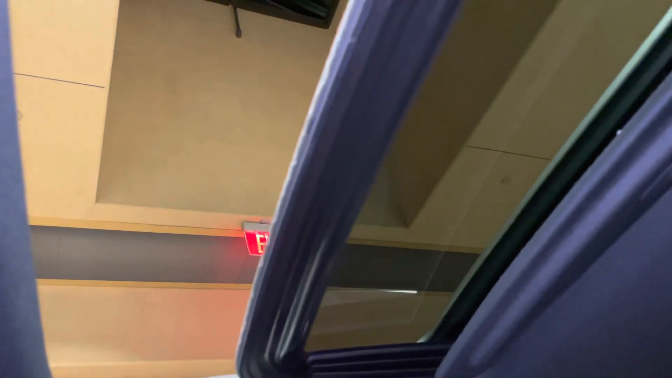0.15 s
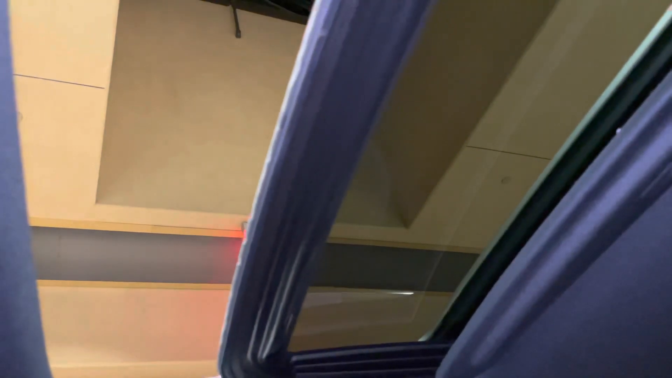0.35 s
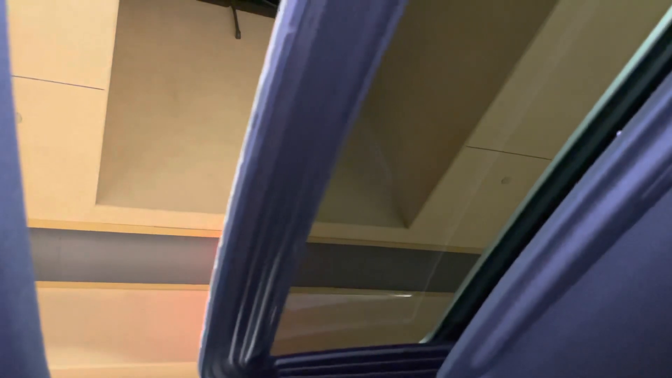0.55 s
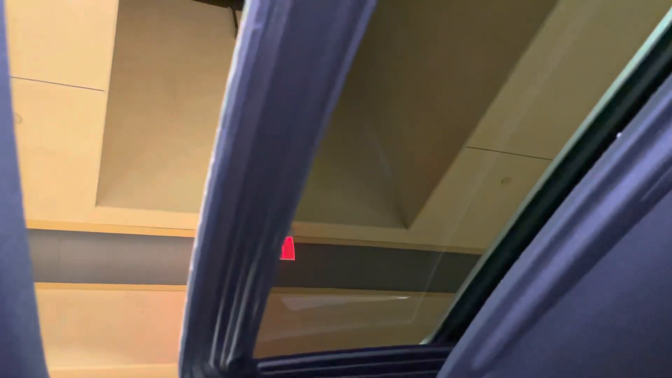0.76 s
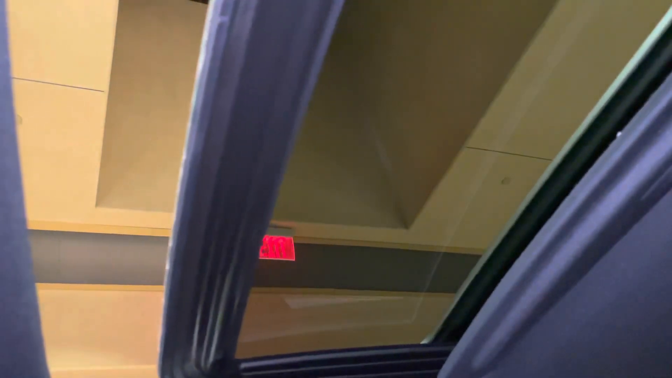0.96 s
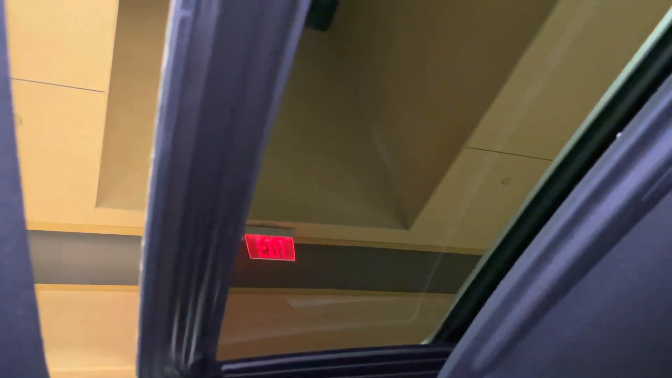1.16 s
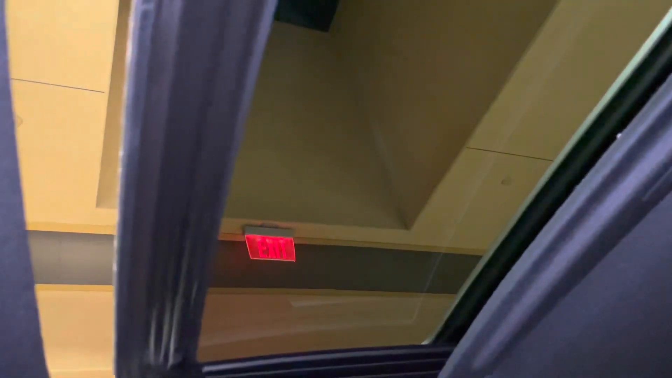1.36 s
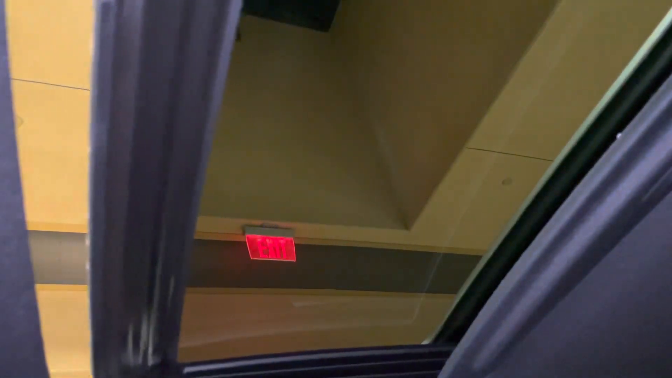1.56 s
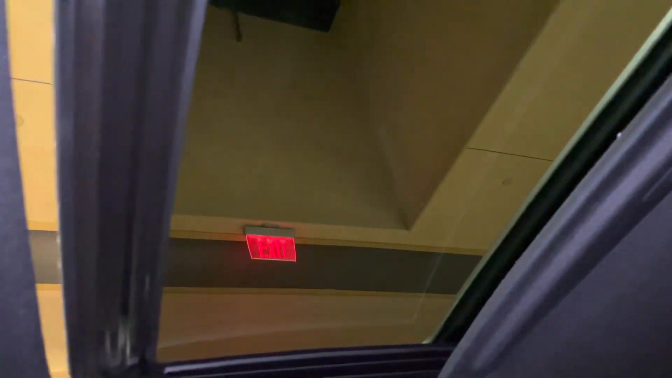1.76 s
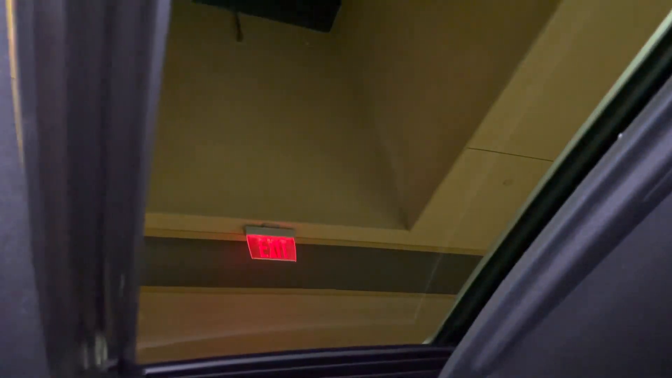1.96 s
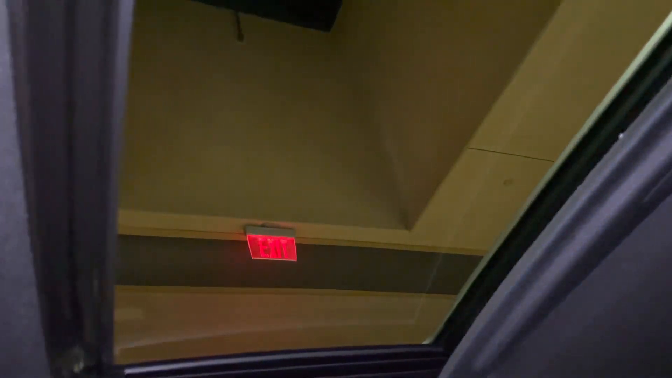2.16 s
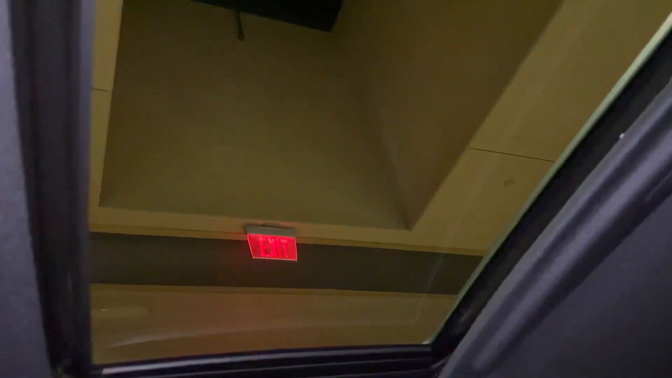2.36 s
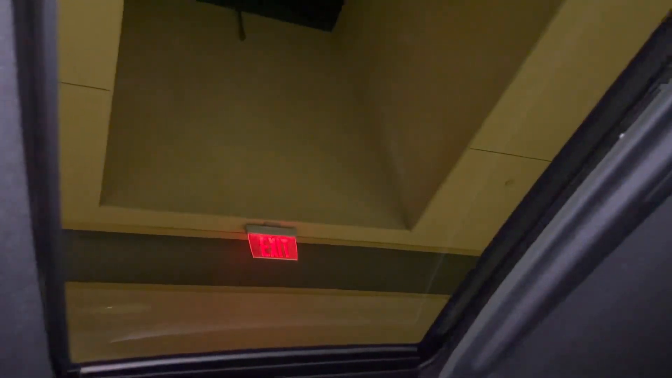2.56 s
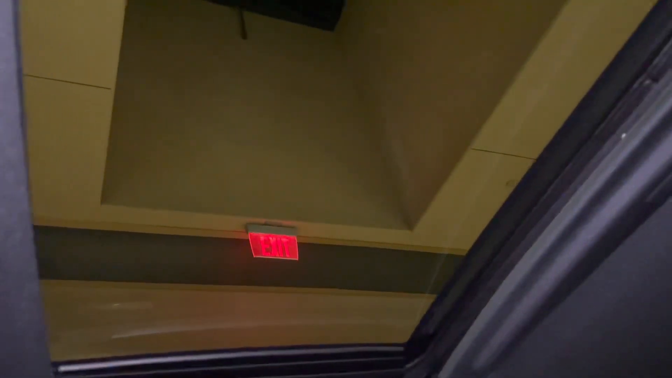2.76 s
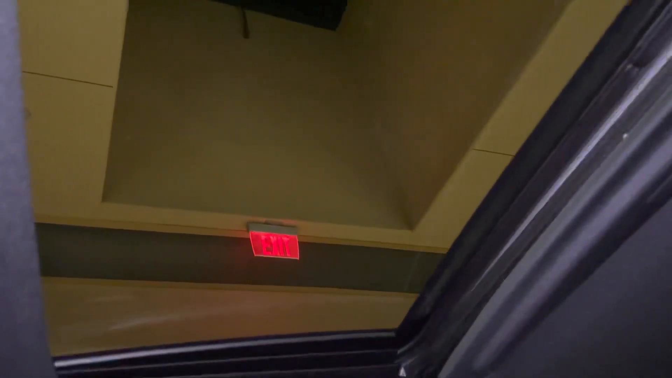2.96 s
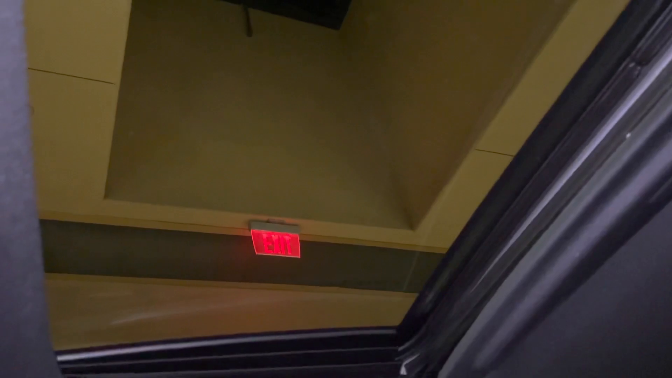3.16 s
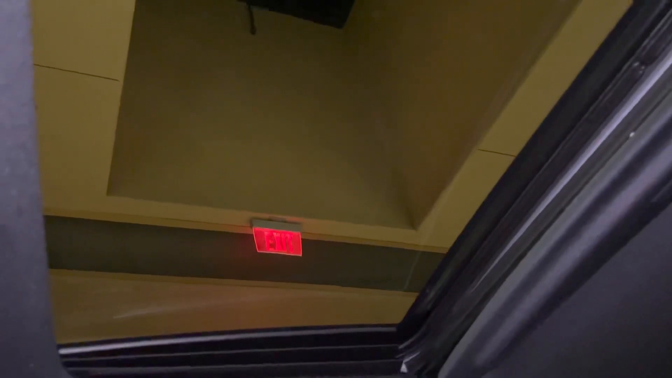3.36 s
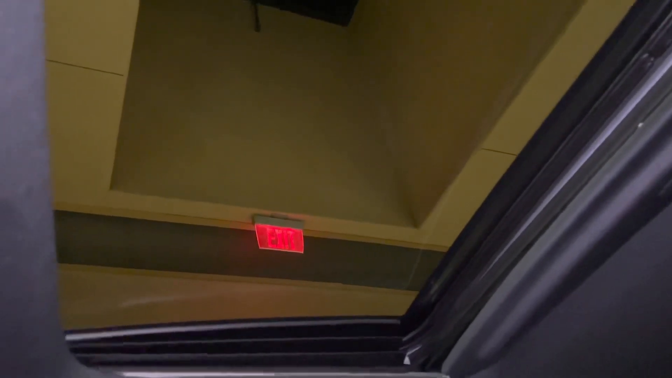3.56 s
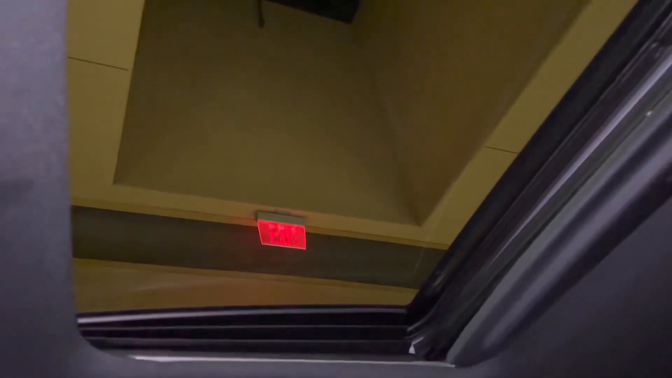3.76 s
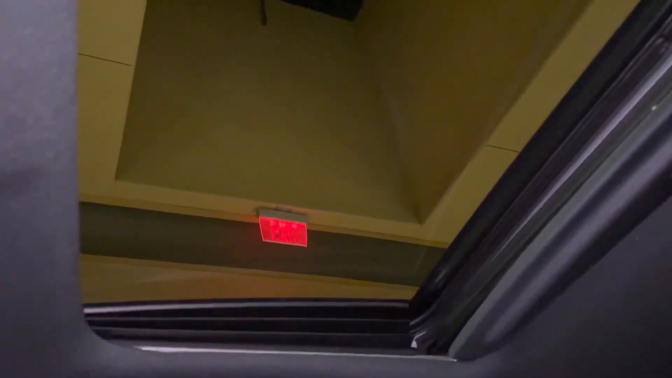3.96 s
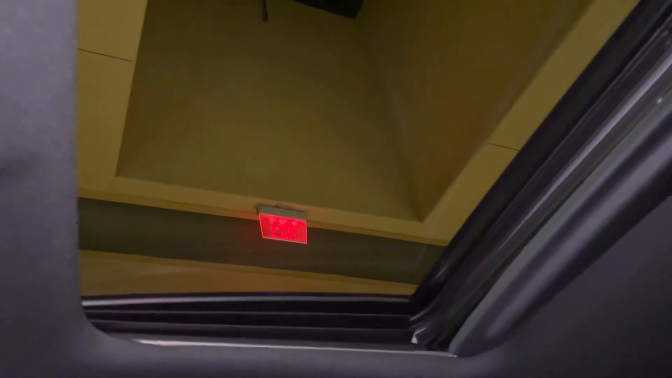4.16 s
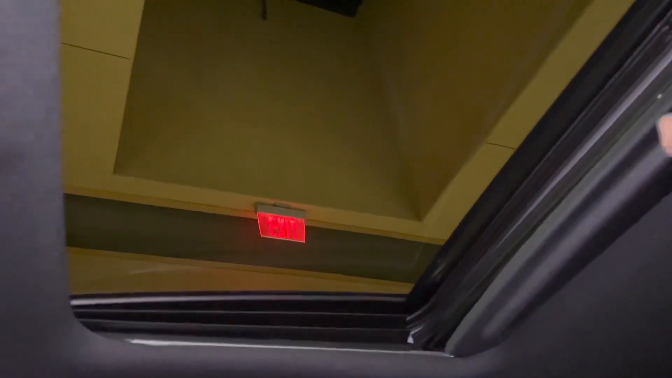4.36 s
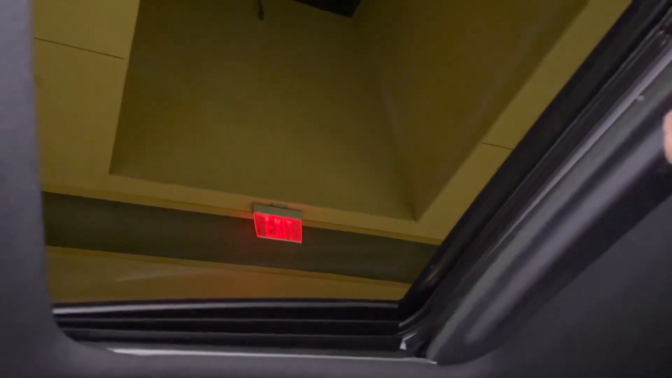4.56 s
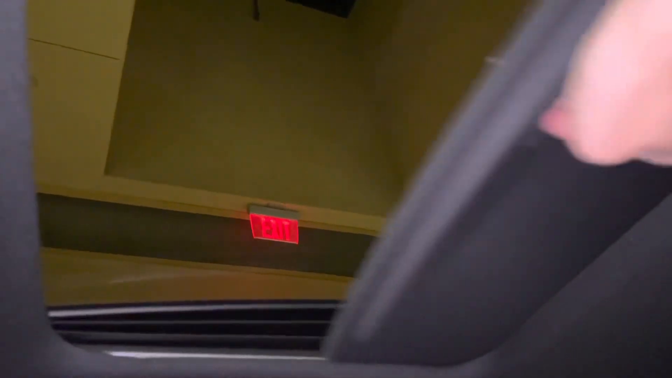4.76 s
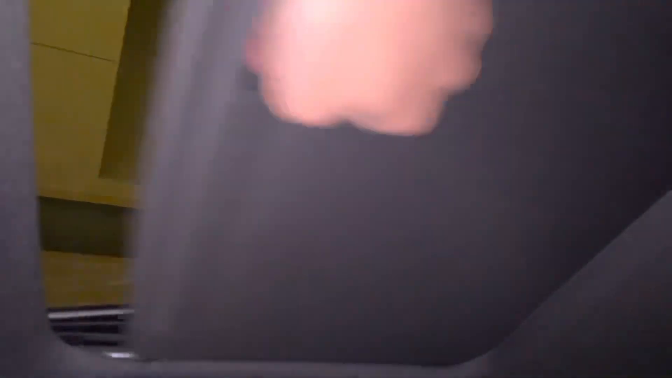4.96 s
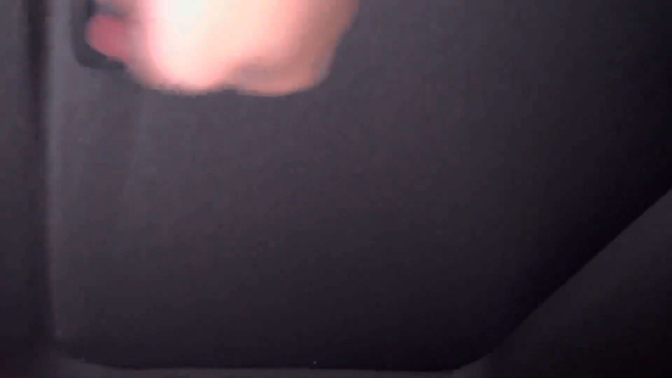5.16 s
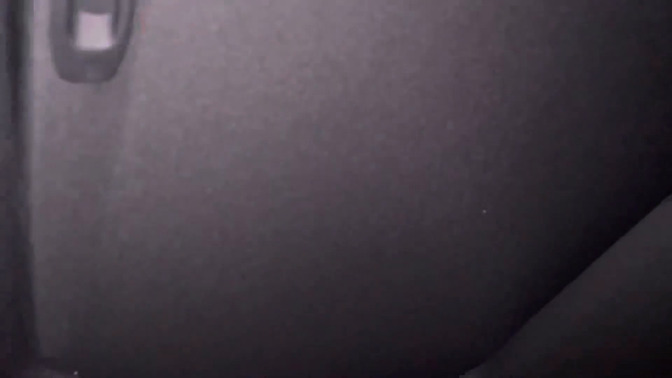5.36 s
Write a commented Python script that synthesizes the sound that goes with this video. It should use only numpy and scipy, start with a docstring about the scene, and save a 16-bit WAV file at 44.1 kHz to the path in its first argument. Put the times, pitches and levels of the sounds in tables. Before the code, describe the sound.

Inside an idling car, a motorized roof panel whirs closed with thuds and a click, then a hand-pushed sunshade rubs quickly and slams.

```python
"""An idling engine hums through a car cabin while a sunroof motor whines and its glass rumbles along its rails.
The glass crunches into its seal, the cabin booms, the drive stops with a clunk and a switch clicks.
Then a hand slides the sunshade faster and faster until it bangs shut. A phone with two microphone ports
hears it close by. Tonal parts are summed sines; rubbing and blows are coloured noise and damped modes."""
import sys
import numpy as np
from scipy import signal
from scipy.fft import rfft, irfft, next_fast_len
from scipy.io import wavfile
from scipy.ndimage import uniform_filter1d, map_coordinates

SR = 44100
rng = np.random.default_rng(int(sys.argv[2]) if len(sys.argv) > 2 else 0)


def digitize_waveform(pressure):
    """Quantize a signal to 16-bit integers and store it at the path in sys.argv[1].

    Rows of a 2-D input are taken as channels; values are limited to [-1, 1].
    """
    field = np.atleast_2d(pressure).T
    bounded = np.clip(field, -1, 1)
    quanta = np.round(bounded * 32767).astype(np.int16)
    wavfile.write(sys.argv[1], SR, quanta)


N = 238565

# Knocks of the glass panel. Each row: start in seconds, rattle in dB, ring in dB, contact brightness in Hz.
KNOCKS = [(1.547, -34, -46.5, 327), (2.596, -39, -53.5, 650), (2.628, -35, -42, 563),
          (2.817, -29.5, -43, 4960), (2.827, -34.5, -19, 3950), (2.846, -36.5, -36.5, 1500),
          (2.94, -46.5, -34.5, 1500), (3.168, -40.5, -34, 2470)]
# Rattle spectrum of the panel, also of the jolting shade. Each row: frequency in Hz, level in dB.
KNOCK_COLOUR = [(120, -6), (230, 0), (320, 0), (450, 3), (650, 0), (1050, -1), (1300, -10), (2200, -15),
                (3000, -25), (5000, -28), (9000, -55), (15000, -56)]
# Spectrum of the fabric-covered shade when rubbed. Each row: frequency in Hz, level in dB.
SHADE_COLOUR = [(500, -6), (760, -22), (960, -2), (1550, -11), (1900, -4), (3000, -12.5), (4500, -12),
                (9000, -22), (11000, -15.5), (13000, -17), (15500, -35)]

SEATED_S, STOP_S = 2.93, 3.17  # the glass is seated; the motor is cut (s)
RIPPLE_DB = 1.8  # peaks and notches that nearby surfaces leave in a rubbing sound (dB)
TOP_HZ = 15750  # band limit of the phone (Hz)


def amp(db):
    """Decibels to gain."""
    return 10 ** (np.asarray(db) / 20)


def unit(x):
    """Scale to rms 1."""
    return x / np.sqrt(np.mean(x ** 2) + 1e-20)


def along(points, hz):
    """Interpolate (Hz, value) points on a log frequency axis."""
    f, v = np.transpose(points)
    return np.interp(np.log(hz + 1), np.log(f + 1), v)


def curves(rows):
    """One value per sample for each column after the time."""
    s, *cols = np.transpose(rows)
    return [np.interp(np.arange(N) / SR, s, c) for c in cols]


def ramp(start, length):
    """0 before start, rising evenly to 1 over length seconds."""
    return np.clip((np.arange(N) / SR - start) / length, 0, 1)


def since(start):
    """Seconds passed since start, 0 before it."""
    return np.maximum(np.arange(N) / SR - start, 0)


def wobble(rate):
    """A smooth random curve, rate knots a second."""
    knots = rng.standard_normal(int(N * rate / SR) + 4)
    return map_coordinates(knots, [np.arange(N) * rate / SR])


def filtered(x, response):
    """Multiply the spectrum of x by a complex response of frequency."""
    m = next_fast_len(N + SR // 2)
    return irfft(rfft(x, m) * response(np.fft.rfftfreq(m, 1 / SR)), m)[..., :N]


def add(track, s, sound):
    """Mix a sound into a track at time s."""
    part = track[..., round(s * SR):][..., :sound.shape[-1]]
    part += sound[..., :part.shape[-1]]


def spread(pair):
    """Mix two unrelated signals as mid and side, so that left and right are alike by a set amount."""
    # Likeness of the two ports, held within 0 to 1 below. Each row: frequency in Hz, likeness.
    alike = [(60, 1.1), (200, 0.5), (450, .5), (700, 0.67), (1200, 0.34), (2500, 0.57), (8000, -1.6),
             (12500, 0.46)]

    def turn(hz):
        return np.arccos(np.clip(along(alike, hz), 0, 1)) / 2

    mid, side = filtered(pair, lambda hz: np.array([np.cos(turn(hz)), np.sin(turn(hz))]))
    return np.array([mid + side, mid - side])


def rush(colour, ripple_db=0):
    """Coloured stereo noise of rms 1; nearby reflections leave fixed peaks and notches in the treble."""
    bumps = rng.standard_normal(SR // 100)

    def shape(hz):
        ripple = ripple_db * np.minimum(hz / 1500, 1) * map_coordinates(bumps, [hz / 70])
        low_cut = np.minimum(hz / colour[0][0], 1) ** 2
        return amp(along(colour, hz) + ripple) * low_cut

    return unit(spread(filtered(rng.standard_normal((2, N)), shape)))


def burst(colour, t60, slope, rise):
    """Dense damped modes of a struck part; the higher bands die sooner. Rms 1 over 20 ms."""
    t = np.arange(SR // 2) / SR
    hz = np.fft.rfftfreq(len(t), 1 / SR)
    low_cut = np.minimum(hz / colour[0][0], 1) ** 2
    noise = rfft(rng.standard_normal((2, len(t)))) * amp(along(colour, hz)) * low_cut
    centres = np.geomspace(150, 14000, 8)
    out = 0
    for centre, pick in zip(centres, np.eye(len(centres))):
        decay = amp(-60 * t / t60 * (centre / 1000) ** slope)  # t60 holds at 1 kHz
        fade = (1 - np.exp(-t / rise)) * decay
        band = irfft(noise * along(np.c_[centres, pick], hz), len(t))
        out = out + unit(fade) * band
    return unit(out) / 5  # the half second carries the energy of 20 ms at rms 1


def ring(modes, rise, scatter_db):
    """Modes of a loosely held part: new strengths for each blow, and phases that drift."""
    t = np.arange(SR // 2) / SR
    tones = 0
    for hz, db, t60 in modes:
        steps = uniform_filter1d(rng.standard_normal(len(t)), size=SR // 3000)
        drift = np.cumsum(steps) * np.sqrt(.05 * hz / SR)
        level = amp(db + scatter_db * rng.normal() - 60 * t / t60)
        tones = tones + level * np.sin(2 * np.pi * hz * t + drift)
    return tones * (1 - np.exp(-t / rise))


def lines(speed, orders, flutter_db, flutter_rate):
    """Sines at multiples of a turning rate, each fluttering in level on its own."""
    angle = 2 * np.pi * np.cumsum(speed) / SR
    total = 0
    for k, db in orders:
        level = np.sqrt(2) * amp(db + flutter_db * wobble(flutter_rate))
        total = total + level * np.sin(k * angle + 2 * np.pi * rng.random())
    return total


def idle():
    """The engine hums at multiples of its cycle rate, over rumbling cabin air and a faint hiss."""
    # Engine hum. Each row: multiple of the cycle rate, level in dB.
    idle_orders = [(2, 0.5), (3, -14), (4, 2), (5, -20.5), (7, -24), (8, -14), (9, -13), (10, -18),
                   (11, -21), (12, -18.5), (13, -26), (14, -19), (15, -22.5), (16, -25), (20, -15),
                   (21, -20), (24, -21.5)]
    # Two steady low hums: a belt-driven accessory at 82 Hz and mains hum at 120 Hz. Each row: frequency in Hz,
    # level in dB against the engine.
    steady_hums = [(82, -14), (120, -13)]
    # Low rumble of the cabin air. Each row: frequency in Hz, level in dB.
    air_colour = [(25, -14), (42, -4), (54, 0), (66, -5), (85, -13), (120, -18), (160, -19.5), (257, -24.5),
                  (305, -32), (400, -22), (750, -37), (1500, -52), (4000, -110)]
    # Spectrum of the faint hiss. Each row: frequency in Hz, level in dB.
    hiss_colour = [(400, 22), (1200, 6), (2500, 0.5), (4500, 2), (7000, -2), (9500, -7.5), (12500, -3),
                   (15500, -19)]
    idle_rate = 17.52  # cycles per s

    hum_db = -46 + 3 * np.exp(-since(0) / 2.26)  # settles from a slightly louder start
    speed = idle_rate * (1 + .002 * wobble(5))
    firing = lines(speed, idle_orders, flutter_db=.6, flutter_rate=5)
    hum_orders = [(hz / idle_rate, db) for hz, db in steady_hums]
    steady_lines = lines(speed, hum_orders, flutter_db=1, flutter_rate=3)
    # the sixth order throbs at first and fades by 2.5 dB per s
    throb = amp(-45 - 2.5 * since(0)) * lines(speed, [(6, 0)], flutter_db=.5, flutter_rate=2)
    drone = amp(-62.5) * rush([(320, -27), (350, 3.0), (368, 5.0), (400, -23), (1000, -100)])
    air = amp(-50.5) * rush(air_colour)
    # the hiss dips as the motor is cut, stays low for a moment and recovers
    dip_db, hold_s, recover_s = 16.5, 0.088, 0.46
    dip = ramp(STOP_S, 0.035) * np.exp(-since(STOP_S + hold_s) / recover_s)
    hiss = amp(-62 - dip_db * dip) * rush(hiss_colour)
    return amp(hum_db) * (firing + steady_lines) + throb + drone + air + hiss


def cabin(x):
    """The padded cabin adds a short, weak tail, most alike at both ports in the bass."""
    tail = burst([(100, 0), (2000, -4), (14000, -9)], t60=.24, slope=.11, rise=.005)
    wet = signal.fftconvolve(x, tail / np.linalg.norm(tail[0]), axes=1)[:, :N]
    return x + amp(-19.5) * spread(wet)


def plastics():
    """The switch snaps back with two hard contacts and bits of trim tick, as short noise bursts."""
    # Switch contacts. Each row: start in seconds, level in dB.
    clicks = [(3.403, -32), (3.409, -34)]
    # Switch spectrum. Each row: frequency in Hz, level in dB.
    click_colour = [(200, 6), (520, 2), (760, -0.5), (950, 3), (1130, -6.5), (1350, -1.5), (2000, -10.5),
                    (2450, -7), (3300, -18.5), (6500, -23.5), (9000, -45), (12700, -25.5), (15500, -47)]
    # Small plastic ticks of the trim. Each row: start in seconds, level in dB.
    ticks = [(3.168, -52), (3.889, -70), (4.3, -68), (4.403, -65), (4.452, -58), (4.544, -54), (5.123, -53),
             (5.161, -56), (5.174, -57)]
    # Trim spectrum. Each row: frequency in Hz, level in dB.
    tick_colour = [(600, 10.5), (1600, 8.5), (2600, -2), (4000, -1.5), (6500, -4), (9000, -10), (12500, 2),
                   (15500, -13)]
    out = np.zeros((2, N))
    for s, db in clicks:
        add(out, s, amp(db) * burst(click_colour, t60=.068, slope=.2, rise=.0005))
    for s, db in ticks:
        add(out, s, amp(db) * burst(tick_colour, t60=.06, slope=.2, rise=.0003))
    return spread(out)


def rustle():
    """Fingers brush over the fabric as they take hold of the shade: sparse snaps of its fibres."""
    grip_s, length_s, fibre_rate = 4.4, .16, 350  # middle (s), spread (s), snaps per s
    t = since(0)
    snaps = (rng.random(N) < fibre_rate / SR) * rng.standard_normal((2, N))
    fabric = filtered(snaps, lambda hz: amp(along(SHADE_COLOUR, hz)) * np.minimum(hz / 1500, 1))
    return amp(-68) * np.exp(-((t - grip_s) / length_s) ** 2) * unit(spread(fabric))


def scrapes():
    """Broad rasps where an edge of the glass or shade catches, drags and chatters finely."""
    # Rasps of the edges. Each row: middle in seconds, centre in Hz, level in dB, spread in seconds.
    rasps = [(1.56, 2150, -61.5, .04), (3.886, 5500, -67, .008), (4.457, 2800, -61, .008),
             (4.595, 1800, -59, .025), (4.66, 1950, -55.5, .045), (4.79, 1900, -51.5, .022),
             (4.88, 2950, -55.5, .028)]
    t = np.arange(N) / SR
    out = np.zeros((2, N))
    for s, hz, db, length in rasps:
        rasp = rush([(hz / 2, -24), (hz * .8, -13), (hz, 0), (hz * 1.2, -13), (hz * 2, -34)])
        out += amp(db + 3 * wobble(220)) * np.exp(-((t - s) / length) ** 2) * rasp
    return out


def slide():
    """The fabric-covered board rubs faster and faster, drumming in its channel."""
    # Spectrum of the drumming board. Each row: frequency in Hz, level in dB.
    board_colour = [(150, 3.5), (250, 7), (420, -7.5), (700, -10.5), (950, -16), (1500, -19), (4000, -49)]
    # Jolts that set the board drumming. Each row: start in seconds, level in dB, t60 in seconds.
    jolts = [(4.639, -45, 0.32), (4.961, -39, 0.61), (5.062, -19.5, 0.15)]
    push_s, full_speed_s, shut_s = 4.08, 4.78, 5.066  # push starts, full speed, stop (s)
    slow_db, fall_db_per_s = 25, 1398  # how much quieter it begins; how it dies at the stop
    tight_db, tight_s = 19, 0.051  # extra rub in the tight last stretch; its length (s)

    speed = ramp(push_s, full_speed_s - push_s)
    motion = ramp(push_s, 0.014) * amp(slow_db * (speed - 1) - fall_db_per_s * since(shut_s))
    rub_db = -51.5 + tight_db * ramp(shut_s - tight_s, tight_s)
    rub_level = motion * amp(rub_db + 0.47 * wobble(35) + 1.3 * wobble(400))
    rub = rub_level * rush(SHADE_COLOUR, ripple_db=RIPPLE_DB)
    shaken = sum(ramp(s, 0.01) * amp(db - 60 * since(s) / t60) for s, db, t60 in jolts)
    drum = (amp(-59.5) * motion + shaken) * amp(0.94 * wobble(40)) * rush(board_colour)
    # the board jolts over a joint in the channel
    joint = np.zeros((2, N))
    add(joint, 4.959, amp(-41) * burst(KNOCK_COLOUR, t60=.1, slope=.2, rise=.001))
    return rub + drum + spread(joint)


def bang():
    """The shade hits its stop and rebounds: noisy clatter over ringing modes."""
    # Blows on the stop. Each row: start in seconds, clatter in dB, ring in dB.
    bangs = [(5.0673, -29, -24), (5.076, -35, -11), (5.094, -32, -27), (5.112, -46, -23), (5.161, -49, -29),
             (5.174, -51, -40)]
    # Clatter spectrum. Each row: frequency in Hz, level in dB.
    bang_colour = [(150, 5), (300, 3.5), (450, 6), (650, -4), (1200, -7.5), (2700, -25), (5000, -40),
                   (9000, -40), (15000, -40)]
    # Modes of the shade and roof lining. Each row: frequency in Hz, level in dB, t60 in seconds.
    shade_modes = [(88, -2, .12), (126.6, 0, .25), (145, -1.5, .083), (207, -6, .16), (247.7, -3.5, .22),
                   (301, -12, .18), (343, -12, .19), (380, -11, .17), (436, -14, .1), (514, -20, .16),
                   (645, -21, .13)]
    clatter, body = np.zeros((2, N)), np.zeros(N)
    for s, clatter_db, ring_db in bangs:
        add(clatter, s, amp(clatter_db) * burst(bang_colour, t60=0.057, slope=0.85, rise=0.00084))
        add(body, s, -amp(ring_db) * ring(shade_modes, rise=0.0024, scatter_db=0))
    return spread(clatter) + body


def boom(hz, t60):
    """Each push on the roof sets the lowest air mode of the cabin swinging."""
    # Pushes of the roof on the cabin air. Each row: start in seconds, level in dB, push length in seconds.
    pushes = [(2.834, -17, 0.033), (2.955, -8.5, 0.042), (3.03, -23, 0.011), (3.181, -47, 0.02),
              (5.078, -12, 0.0065), (5.136, -15.5, 0.0076), (5.253, -21.5, 0.012)]
    air = np.zeros(N)
    for s, db, push in pushes:
        add(air, s, amp(db) * ring([(hz, 0, t60)], rise=push, scatter_db=0.0))
    return air


def glass():
    """The panel bumps softly over its guides, crunches into the seal and the drive meets its end stop."""
    # Modes of the glass. Each row: frequency in Hz, level in dB, t60 in seconds.
    panel = [(124.7, -6, .5), (188, -5, .37), (280, -11, .17), (312, -13, .2), (378, -6, .16),
             (455, -6.5, .14), (549, -11, .13), (608, -13, .23)]
    # Modes of the lifting linkage under the glass. Each row: frequency in Hz, level in dB, t60 in seconds.
    linkage = [(560, -1, .08), (743, -2, .09), (950, -3, .08), (1060, 2, .08), (1850, -15, .08),
               (2120, -8, .08)]
    # Modes of the drive's end stop. Each row: frequency in Hz, level in dB, t60 in seconds.
    end_stop = [(450, 8, .16), (1660, 2, .06), (3850, -8, .05), (4230, -9, .05)]
    rattle, body = np.zeros((2, N)), np.zeros(N)
    for s, rattle_db, ring_db, bright_hz in KNOCKS:
        contact = signal.butter(2, min(bright_hz, TOP_HZ), fs=SR)  # a soft contact dulls the blow
        clatter = signal.lfilter(*contact, burst(KNOCK_COLOUR, t60=0.12, slope=0.34, rise=0.00044))
        clank = signal.lfilter(*contact, ring(linkage, rise=.001, scatter_db=1.5))
        add(rattle, s, amp(rattle_db) * clatter)
        add(body, s, amp(rattle_db - 3) * clank)
        add(body, s, amp(ring_db) * ring(panel, rise=.003, scatter_db=1.5))
    add(body, 3.169, amp(-43.5) * ring(end_stop, rise=0.0012, scatter_db=0))
    return spread(rattle) + body


def shaft_speed():
    """Turns per second: knocks on the way drag the motor down; it races once the glass is seated, then brakes."""
    # Motor speed while the glass travels. Each row: time in seconds, shaft turns per second.
    travel = [(0, 82.2), (1.25, 84.2), (2.55, 83), (2.8, 81.3)]
    free_rate, brake_rate = 90.3, 400  # unloaded turns per s; turns per s lost each s once cut
    sag_rate, sag_power, sag_s = 14.5, .42, .045  # turns per s lost at 0 dB ring; power; s to deepest
    speed, = curves(travel)
    speed = free_rate + (speed - free_rate) * np.exp(-since(SEATED_S) / .075)
    for s, _, ring_db, _ in KNOCKS:
        if s < SEATED_S:
            u = since(s) / sag_s
            speed = speed - sag_rate * amp(ring_db) ** sag_power * u * np.exp(1 - u)
    return np.maximum(speed - brake_rate * since(STOP_S), 0)


def drive():
    """The motor whines, its slot tone swelling near the roof's resonance; the glass rubs along its rails."""
    # Weaker motor lines. Each row: multiple of the shaft rate, level in dB.
    motor_orders = [(1, -1), (2, -8), (3, -13.5), (5, -15.5), (9, -11), (11, -33), (16, -12), (18, -36),
                    (24, -24), (32, -28), (39, -25)]
    # Slot tone ahead of the roof's resonance. Each row: time in seconds, level in dB.
    slot_levels = [(.2, -66), (.7, -50), (1.4, -46), (2.1, -45.5), (2.5, -49), (2.96, -51), (3.01, -45.5),
                   (3.1, -50)]
    # Rumble of the glass on its rails. Each row: frequency in Hz, level in dB.
    rail_body = [(110, -9.5), (190, -11.5), (300, -10.5), (480, -9.5), (600, -10.5), (1000, -13.5),
                 (1450, -17), (1750, -19.5), (2100, -20), (2900, -28.5), (4700, -33), (6000, -53),
                 (9000, -85)]
    # Hiss of the rails. Each row: frequency in Hz, level in dB.
    rail_hiss = [(2000, 3.5), (4000, 3.5), (5600, -2), (6800, 1.5), (9200, -12.5), (10500, 0), (12500, 3),
                 (14200, -7), (15800, -13.5)]
    slot_order = 8  # armature slot rate as a multiple of the shaft rate
    roof_hz, roof_width_hz = 687.7, 50
    seal_s = 2.82  # the glass meets its seal
    pinch_db, pinch_s = 6.5, 0.085  # the seal makes the rumble swell briefly
    muffle_db, muffle_s = 8.5, .1  # and muffles the hiss

    t = since(0)
    speed = shaft_speed() * (1 + .0015 * wobble(25) + .002 * wobble(6))
    resonance = 1 / np.hypot(1, 2 * (slot_order * speed - roof_hz) / roof_width_hz)
    slot = resonance * lines(speed, [(slot_order, 0)], flutter_db=.9, flutter_rate=18)
    overtone_db = -52.5 + 3 * ramp(SEATED_S, .075)  # louder once the motor races
    overtones = amp(overtone_db) * lines(speed, motor_orders, flutter_db=.9, flutter_rate=18)
    slot_db, = curves(slot_levels)
    whine = amp(slot_db) * slot + overtones
    # both rail sounds drift slowly in level along the way
    rumble_db = -51 - 0.35 * t + pinch_db * np.exp(-((t - seal_s) / pinch_s) ** 2)
    hiss_db = -63.5 + t - muffle_db * ramp(seal_s, muffle_s)
    rumble_level = amp(rumble_db + 1.6 * wobble(15) + 0.25 * wobble(190))
    rumble = rumble_level * rush(rail_body, ripple_db=RIPPLE_DB)
    hiss_level = amp(hiss_db + 0.63 * wobble(30.13) + 0.47 * wobble(300))
    hiss = hiss_level * rush(rail_hiss, ripple_db=3.5)
    run_down = amp(-451 * since(STOP_S))  # dB per s once cut
    return run_down * (whine + rumble + hiss)


def scene():
    """Mix all sources; the sound reaches the left port a little sooner, at a slightly different level."""
    # Phase between the ports. Each row: frequency in Hz, radians by which left leads.
    lead = [(40, .2), (120, .35), (220, .5), (380, 1.7), (670, 2), (1100, 3.1), (2200, 4.6), (6000, 5.6),
            (12000, 6.3)]
    # Level between the ports. Each row: frequency in Hz, left minus right in dB.
    balance_db = [(60, .3), (200, -.7), (450, 2), (1000, 2.7), (2200, -.7), (5000, 3), (8000, 1.5),
                  (12000, 0)]
    handled = glass() + slide() + rustle() + scrapes() + bang() + plastics()
    sound = idle() + drive() + boom(hz=51.0, t60=0.29) + cabin(handled)

    def half(hz):
        return amp(along(balance_db, hz) / 2) * np.exp(1j * along(lead, hz) / 2)

    return filtered(sound, lambda hz: np.array([half(hz), 1 / half(hz)]))


def record(dry):
    """The phone keeps nothing above its band limit."""
    return filtered(dry, lambda hz: hz < TOP_HZ)


dry = scene()
out = record(dry)
digitize_waveform(out)
```